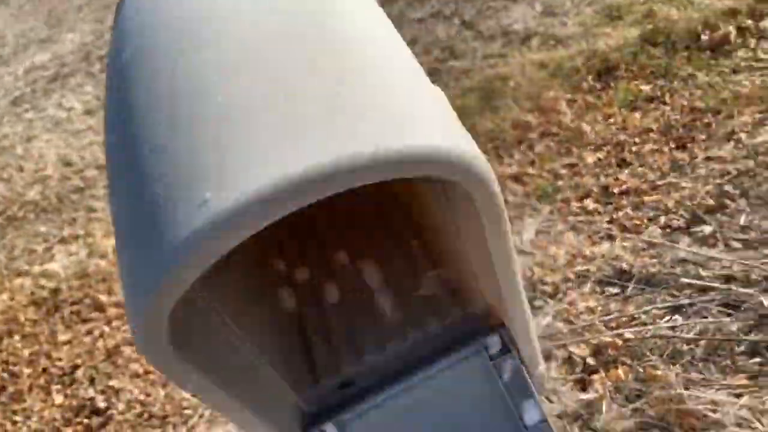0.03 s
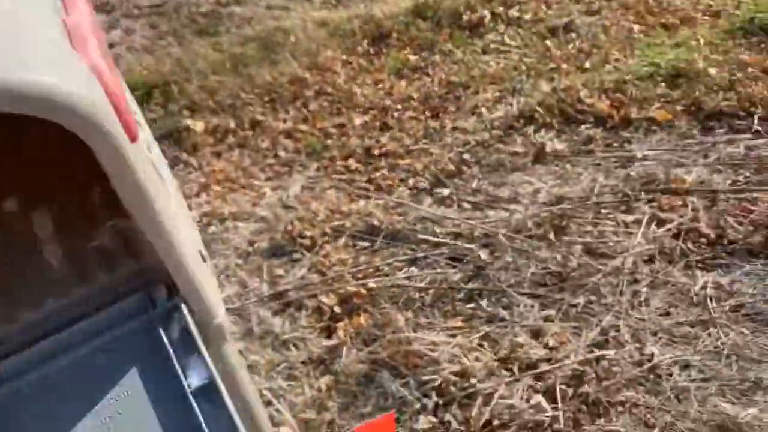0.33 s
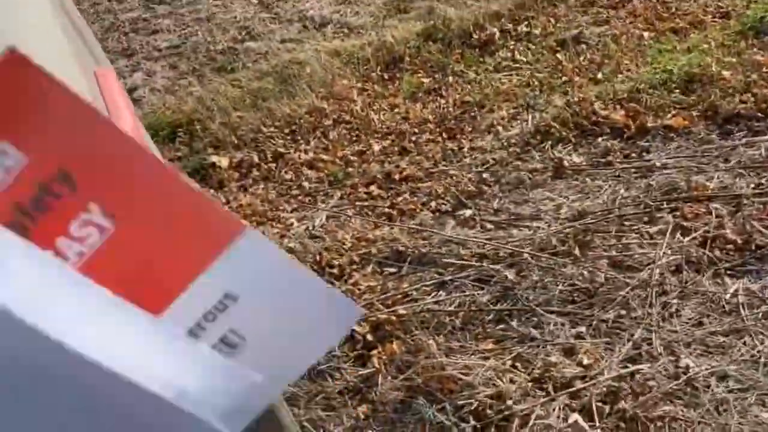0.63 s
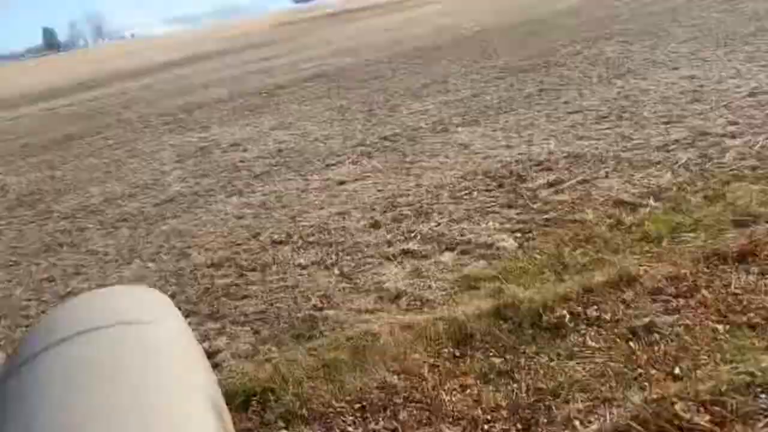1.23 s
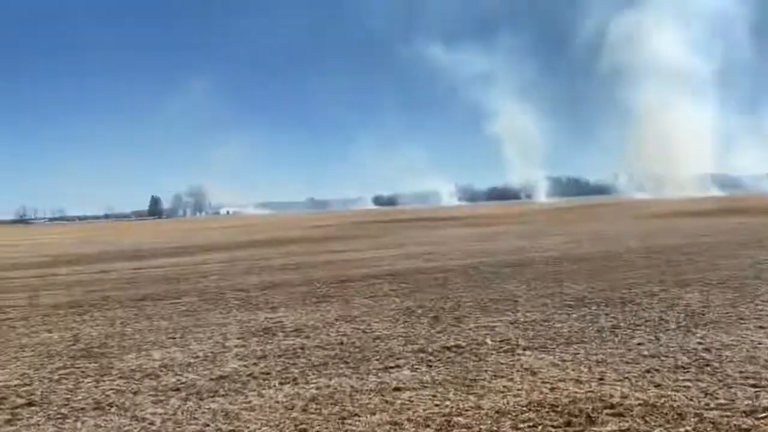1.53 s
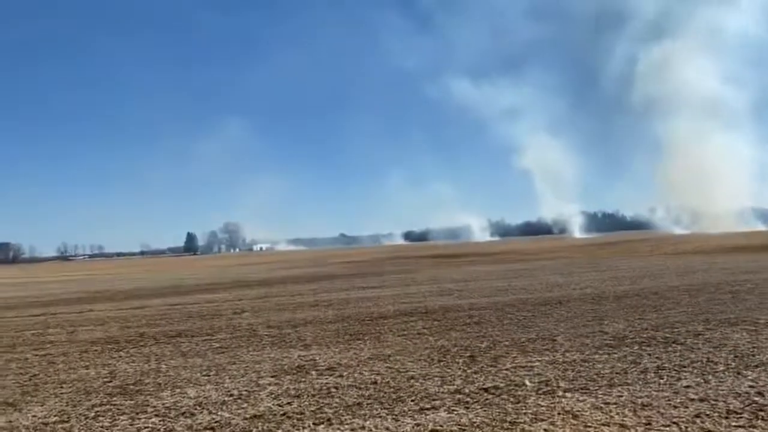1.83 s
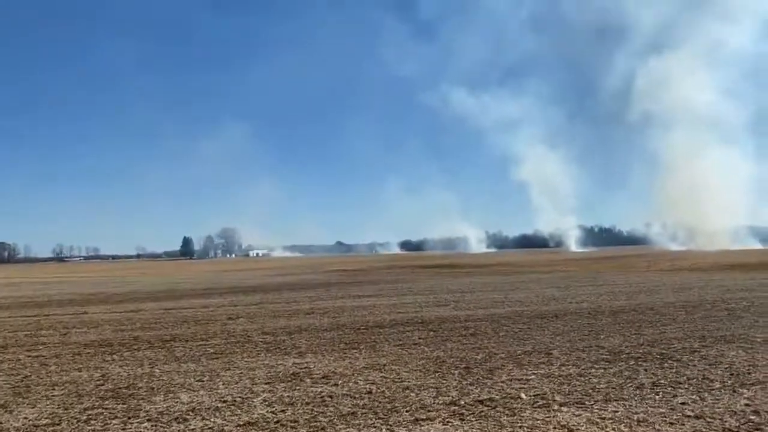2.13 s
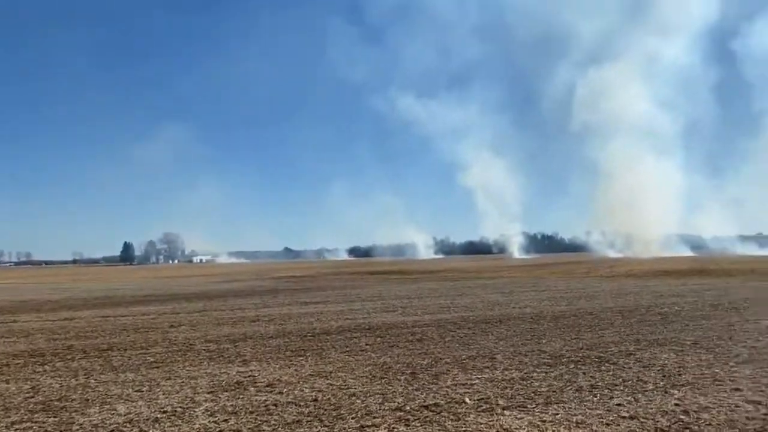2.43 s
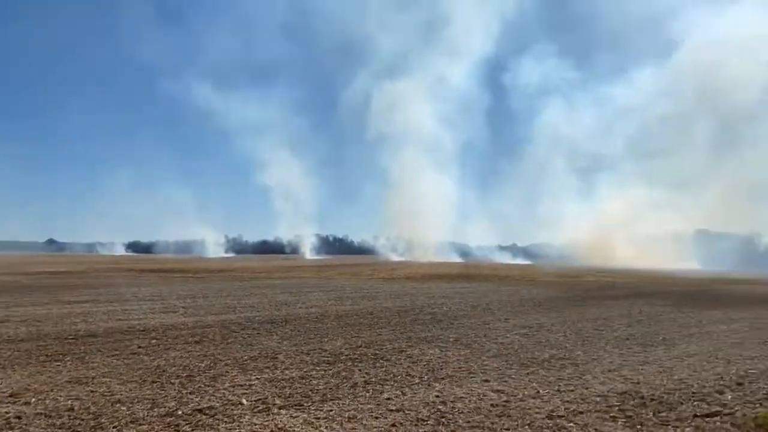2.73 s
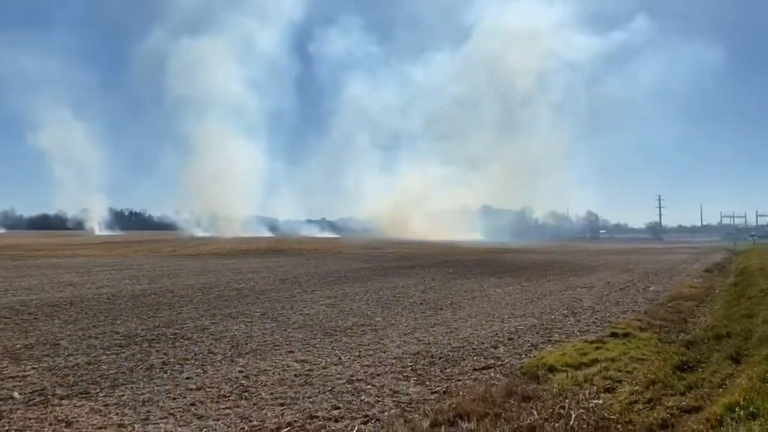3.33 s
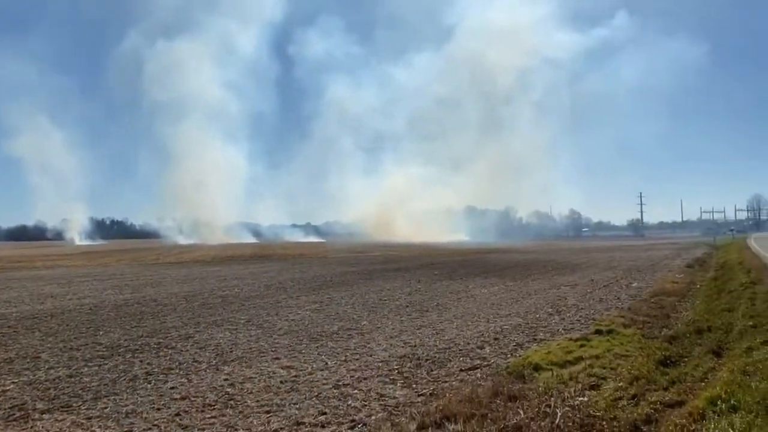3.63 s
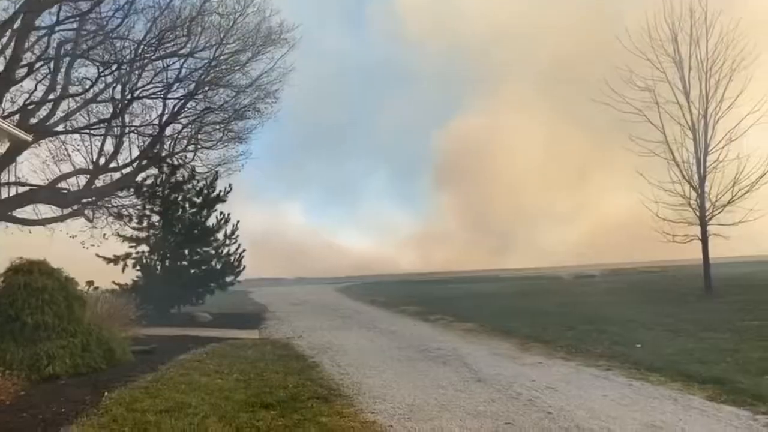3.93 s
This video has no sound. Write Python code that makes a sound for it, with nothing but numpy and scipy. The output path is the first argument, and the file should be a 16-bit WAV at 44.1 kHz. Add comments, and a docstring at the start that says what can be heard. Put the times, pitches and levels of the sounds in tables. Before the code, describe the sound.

A mailbox door claps shut close by at about 0.7 seconds, with a quick rattle, short ring and thump. Before it, wind buffets the microphone while letters slide and tick. Paper rustles and clicks again from 1.1 to 1.5 seconds over a faint low hum. Gusts return from 2.5 seconds. Near 3.7 a crinkle comes, the sound briefly cuts out, then resumes with soft hiss and two thin whistling tones.

```python
"""A mailbox door claps shut close to the microphone, at a roadside in open fields.
It chatters on its frame, rings the box and thumps the post. Letters slide out, paper and a sleeve
rustle, latch and fingers tick. Wind buffets the microphone over a low hum, like an idling engine.
Near the end the sound drops out briefly and returns with a brighter hiss and two thin whistles."""
import sys
import numpy as np
from scipy import signal
from scipy.fft import rfft, irfft
from scipy.io import wavfile
from scipy.ndimage import uniform_filter1d, minimum_filter1d

SR = 44100
rng = np.random.default_rng(int(sys.argv[2]) if len(sys.argv) > 2 else 0)


def log_audio(samples):
    """Write samples as a 16-bit WAV file to the path given in sys.argv[1]."""
    # one column per channel
    frames = np.atleast_2d(samples).T
    # limit to full scale, then quantise
    limited = np.clip(frames, -1, 1)
    pcm = np.round(limited * 32767).astype(np.int16)
    wavfile.write(sys.argv[1], SR, pcm)


N = 176400
T = np.arange(N) / SR
DROPOUT_S, RETURN_S = 3.724, 3.805


def from_db(db):
    """Decibels to gain."""
    return 10 ** (np.asarray(db) / 20)


def unit_power(x):
    """Scale to an RMS of 1."""
    return x / np.sqrt(np.mean(x ** 2) + 1e-20)


def envelope(points):
    """Gain over time from (time_s, level_db) points."""
    return from_db(np.interp(T, *np.transpose(points)))


def filtered(x, points):
    """Shape the spectrum by (freq_hz, level_db) points, falling away outside them."""
    hz, db = np.transpose(points)
    f = np.maximum(np.arange(N // 2 + 1) * SR / N, 1)
    edges = np.minimum(f / hz[0], 1) ** 2 * np.minimum(hz[-1] / f, 1) ** 2
    return irfft(rfft(x) * edges * from_db(np.interp(np.log(f), np.log(hz), db)), N)


def noise(points):
    """Coloured noise of unit power."""
    return unit_power(filtered(rng.standard_normal(N), points))


def drift(rate_hz):
    """Random wander of unit power, mostly slower than rate_hz."""
    f = np.arange(N // 2 + 1) * SR / N
    return unit_power(irfft(rfft(rng.standard_normal(N)) / (1 + (f / rate_hz) ** 2), N))


def evened(x, size):
    """Remove chance swells longer than size samples."""
    return x / np.sqrt(uniform_filter1d(x ** 2, size) + 1e-9)


def resonate(x, hz, width_hz):
    """A resonance with gain 1 at its peak."""
    r = np.exp(-np.pi * width_hz / SR)
    feedback = [1, -2 * r * np.cos(2 * np.pi * hz / SR), r * r]
    return signal.lfilter(np.array([1, 0, -1]) * (1 - r * r) / 2, feedback, x)


def swell(centre_s, width_s):
    """Smooth bell-shaped envelope."""
    return np.exp(-.5 * np.minimum(np.abs(T - centre_s) / width_s, 10) ** 2)


def decay(start_s, t60_s):
    """Envelope that starts at once and dies away."""
    return np.exp(-np.log(1000) * np.clip((T - start_s) / t60_s, 0, 10)) * (T >= start_s)


def wind():
    """Gusts rumble on the microphone; each eddy is a low pressure swing with turbulence on top."""
    # gusts: time_s, level_db
    gusts = [(0,-24),(.05,-17),(.1,-28.5),(.16,-19),(.26,-29),(.36,-23.5),(.41,-40.5),(.9,-46),(1.52,-50),(1.65,-39),(1.76,-45),(2.55,-48.5),(2.62,-27.5),(2.76,-25.5),(2.83,-37.5),(2.9,-30.5),(2.95,-22.5),(3.01,-40),(3.24,-32),(3.34,-43),(3.58,-46),(3.69,-29.5),(3.74,-44.5),(4,-36)]
    # rumble spectrum: freq_hz, level_db
    rumble_colour = [(20,-19),(45,4),(70,1.5),(110,-1),(180,-11),(350,-27.5),(600,-38),(1500,-75)]
    # eddies striking the microphone: time_s, level_db, reach_hz
    buffets = [(0.037,-18.5,280),(0.144,-19.5,210),(0.18,-20,380),(0.235,-18,376),(0.31,-21.5,140),(1.463,-25.5,120),(2.514,-24,95),(2.583,-28.5,260),(2.632,-29.5,210),(2.679,-30.5,160),(2.727,-24.5,330),(2.749,-22,387),(2.779,-25,110),(2.934,-21.5,386),(2.959,-19.5,251),(3.217,-23,130),(3.274,-27.5,90),(3.647,-26.5,350),(3.685,-23,240)]
    push_hz, turbulence_db = 67, -3.5
    out = envelope(gusts) * evened(noise(rumble_colour), size=1100)
    swirl = noise([(91.5, 0), (2000, -18)])
    for (s, db, reach_hz), phase in zip(buffets, rng.uniform(0, 2 * np.pi, len(buffets))):
        push = np.sqrt(2) * np.sin(2 * np.pi * push_hz * (T - s) + phase) * swell(s, width_s=0.009)
        eddy = signal.sosfilt(signal.butter(3, reach_hz, fs=SR, output="sos"), swirl)
        turbulence = from_db(turbulence_db) * swell(s, width_s=0.0075) * evened(eddy, size=600)
        out += from_db(db) * (push + turbulence)
    return out


def hum_and_air():
    """A wavering low hum and the soft hiss of the fields all around."""
    # open-air spectrum: freq_hz, level_db
    air_colour = [(59, -39), (100, 0.5), (228, -25), (333, -13.5), (552, -28), (956, -23.5), (1400, -28.5),
                  (4370, -33), (8230, -47.5), (9950, -58.5), (13700, -52.5), (15500, -76)]
    hum_hz, wander_hz, hum_db, waver_db, air_db = 64.3, 2.51, -42.5, 3.5, -52.5
    phase = 2 * np.pi * np.cumsum(hum_hz + wander_hz * drift(2.5)) / SR
    hum = np.sqrt(2) * np.sin(phase) * from_db(hum_db + waver_db * drift(12))
    air = from_db(air_db + 2 * drift(15)) * noise(air_colour)
    return hum + air


def paper_and_sleeve():
    """Friction hisses with tiny crinkles; each sliding stroke is a rough swish whose resonance glides."""
    # paper rustle: time_s, level_db
    rustle = [(0,-40),(.155,-40.5),(.2,-56),(.27,-49),(.4,-49.5),(.5,-53.5),(.6,-44.5),(.76,-61),(.85,-53.5),(1.02,-63.5),(1.16,-58.5),(1.2,-48.5),(1.31,-49),(1.36,-49.5),(1.5,-60),(3.45,-63.5),(3.66,-55.5),(3.715,-40.5),(3.76,-57)]
    # paper spectrum: freq_hz, level_db
    paper_colour = [(200,12),(600,0.5),(1000,2),(1400,-6),(2100,0),(4200,-0.5),(5500,-10),(7500,-25.5),(11000,-32),(15000,-28.5)]
    # strokes of paper and sleeve: start_s, length_s, level_db, start_hz, end_hz, width_hz
    slides = [(-.05,0.18,-41,2053,1950,500),(-.05,0.17,-42.5,3296,3015,700),(0.242,0.43,-49,2064,1746,480),(0.38,0.19,-50,3370,3070,1200),(0.554,0.058,-51,955,940,600),(1.056,0.15,-45.5,298,416,333),(1.255,0.197,-47,1306,1593,910),(2.035,0.59,-58.5,1615,1430,330),(2.95,0.56,-59.5,1326,1496,200),(3.464,0.31,-53.5,1482,1793,430)]
    crinkles_per_s, crinkle_db, spread_db, rough_db = 170, -2.5, 4, 2.5
    sizes = from_db(spread_db * np.minimum(rng.exponential(1, N), 3)) * rng.choice([-1, 1], N)
    impulses = sizes * (rng.random(N) < crinkles_per_s / SR)
    crinkles = unit_power(filtered(impulses, paper_colour))
    out = envelope(rustle) * (noise(paper_colour) + from_db(crinkle_db) * crinkles)
    grip = unit_power(from_db(rough_db * drift(60)))  # the surfaces catch and slip
    for start_s, length_s, db, start_hz, end_hz, width_hz in slides:
        along = np.clip((T - start_s) / length_s, 0, 1)
        phase = 2 * np.pi * np.cumsum(start_hz + (end_hz - start_hz) * along) / SR
        swish = drift(width_hz / 2) * np.cos(phase) + drift(width_hz / 2) * np.sin(phase)
        out += from_db(db) * np.sqrt(np.abs(np.sin(np.pi * along))) * grip * swish
    return out


def ticks():
    """Paper, latch and fingers tick: each is a brief broad snap with one resonance."""
    # small contacts: start_s, level_db, pitch_hz
    touches = [(0.02,-19.5,4020),(0.054,-16.5,3470),(0.103,-23.5,1990),(0.133,-27,3940),(.151,-29.5,4400),(0.181,-26,4500),(.269,-26.5,3900),(.308,-22,2920),(0.6165,-25.5,4200),(0.636,-26,4550),(0.7369,-25,3870),(.769,-32.5,4230),(0.826,-34,4100),(.906,-39.5,1930),(1.1531,-35.5,4040),(1.178,-25,3930),(1.223,-31,2900),(1.271,-28.5,4000),(1.307,-25.5,4630),(1.322,-23.5,1280),(1.332,-28,1370),(1.45,-33.5,1260),(1.638,-36,2960),(1.819,-34.5,1110),(2.439,-36.5,1530),(2.849,-45.5,1160),(2.929,-40,1150),(3.432,-33.5,1466),(3.432,-34,4480),(3.635,-35,3580),(3.721,-26,1400),(3.811,-28.5,1536)]
    # tone shaping of all ticks: freq_hz, gain_db
    tick_colour = [(900,0.5),(4700,-5),(6500,-19),(10000,-21.5),(15000,-28.5)]
    ring_q, snap_db = 3.7, -7.5
    snap = evened(rng.standard_normal(N), size=30)
    out = np.zeros(N)
    for start_s, db, hz in touches:
        ring = evened(resonate(snap, hz, hz / ring_q), size=70)
        out += from_db(db) * decay(start_s, t60_s=0.013) * (ring + from_db(snap_db) * snap)
    return filtered(out, tick_colour)


def crunches():
    """Bending paper gives short clusters of bright crackles."""
    # bends of the paper: time_s, level_db, half_length_s
    bends = [(0.055,-46,0.0053),(1.303,-50.5,0.012),(3.719,-47.5,0.018)]
    # crackle spectrum: freq_hz, level_db
    crunch_colour = [(2500,4),(5500,11),(7500,2),(10000,-14),(15000,-3)]
    clusters = sum(from_db(db) * swell(s, width_s) for s, db, width_s in bends)
    return clusters * noise(crunch_colour) * from_db(5.2 * drift(190))


def door():
    """The door chatters on its frame: each contact claps and rings the box, and the post thumps."""
    # door meeting frame: start_s, level_db
    contacts = [(0.6526,6),(0.6559,4.5),(.660,3.5),(0.6654,3),(0.669,-2),(0.673,-1.5),(0.682,-10.5),(.689,-16)]
    # spectrum of the bare clap: freq_hz, level_db
    clap_colour = [(100,-8),(260,-11.5),(600,-10),(900,-11),(1550,6),(2000,-3),(2900,0),(4400,-3),(5500,-11.5),(6800,-26.5),(8000,-20.5),(10000,-38),(15000,-47.5)]
    # resonances of the box: pitch_hz, level_db, t60_s
    box_modes = [(124.6,-34.5,0.19),(153.6,-32,0.34),(188,-39,.3),(380,-38,0.16),(429.6,-23.5,0.11),(744,-29.5,0.097),(1047.5,-25.5,0.082),(1255,-33,0.039),(1427,-28.5,0.049),(1591,-18.5,.045),(1762,-33,0.083),(2200,-52,.38),(2164,-29,0.033),(2302,-31,.062),(2411,-27.5,0.076),(2696,-28,.05),(3056,-30,.055),(4233,-28,0.05)]
    rise_s, jolt_rad = 0.0003, 0.69
    thump_s, thump_hz, thump_db = 0.667, 128, -13.5
    start_s, contact_db = np.transpose(contacts)
    t = T[:SR * 3 // 2]
    age = t - start_s[:, None]
    touched = 1 - np.exp(-np.clip(age / rise_s, 0, 20))

    def ring_down(t60_s):
        """Envelope of all contacts, summed in power."""
        each = from_db(contact_db[:, None] - 60 * np.abs(age) / t60_s) * touched
        return np.sqrt(np.sum(each ** 2, axis=0))

    clap = from_db(-16) * ring_down(t60_s=0.03)
    tail = from_db(-41.5) * ring_down(t60_s=0.19)
    out = evened(noise(clap_colour), size=130)[:len(t)] * (clap + tail)
    for hz, db, t60_s in box_modes:
        jolts = jolt_rad * rng.standard_normal(len(contacts)) @ touched  # each contact upsets the phase
        out += from_db(db) * ring_down(t60_s) * np.sin(2 * np.pi * hz * age[0] + jolts)
    post_swing = np.sin(2 * np.pi * thump_hz * (T - thump_s))
    thump = from_db(thump_db) * swell(thump_s, width_s=0.0062) * post_swing
    return np.pad(out, (0, N - len(out))) + thump


def whistling_hiss():
    """A bright steady hiss with two thin wavering whistles comes in as the dropout ends."""
    # hiss spectrum: freq_hz, level_db
    hiss_colour = [(120, -33), (200, -19), (554, -11), (1950, -12), (5490, -14.5), (14200, -54),
                   (15500, -74)]
    # tones in the hiss: pitch_hz, level_db
    whistles = [(3375,-48.5),(5075,-48)]
    hiss_db, wander_hz, flutter_db = -45, 12.6, 2.5
    out = from_db(hiss_db) * noise(hiss_colour)
    for hz, db in whistles:
        phase = 2 * np.pi * np.cumsum(hz + wander_hz * drift(109)) / SR
        out += np.sqrt(2) * from_db(db + flutter_db * drift(150)) * np.sin(phase)
    return out * (T >= RETURN_S)


def scene():
    """All sources at one microphone beside the mailbox."""
    mix = wind() + hum_and_air() + paper_and_sleeve() + ticks() + crunches() + door() + whistling_hiss()
    return mix[None]


def record(dry):
    """The deepest bass is cut, the sound drops out briefly, a limiter holds peaks and the top is cut."""
    low_cut_hz, high_cut_hz, dropout_db, ceiling = 7.6, 16100, -35, 0.52
    out = signal.sosfilt(signal.butter(2, low_cut_hz, "high", fs=SR, output="sos"), dry)
    gap = uniform_filter1d(((T > DROPOUT_S) & (T < RETURN_S)) * 1., size=90)
    out *= from_db(dropout_db * gap)
    needed_gain = ceiling / np.maximum(np.abs(out), ceiling)
    gain = uniform_filter1d(minimum_filter1d(needed_gain, size=91), size=91)  # hold and smooth over 2 ms
    return signal.sosfilt(signal.cheby2(12, 70, high_cut_hz, fs=SR, output="sos"), out * gain)


dry = scene()
out = record(dry)
log_audio(out)
```